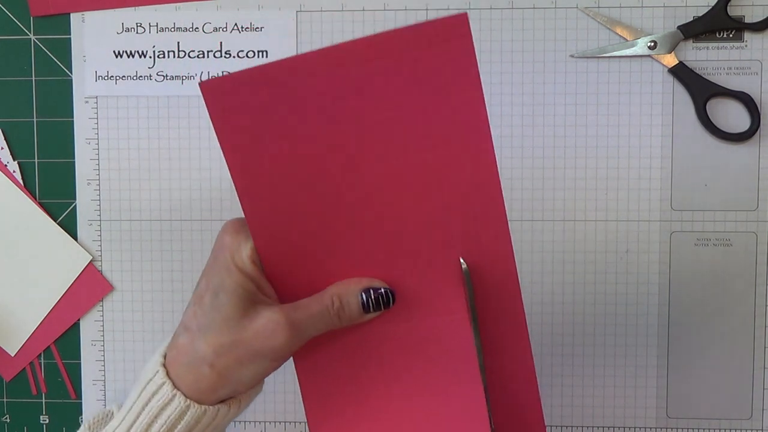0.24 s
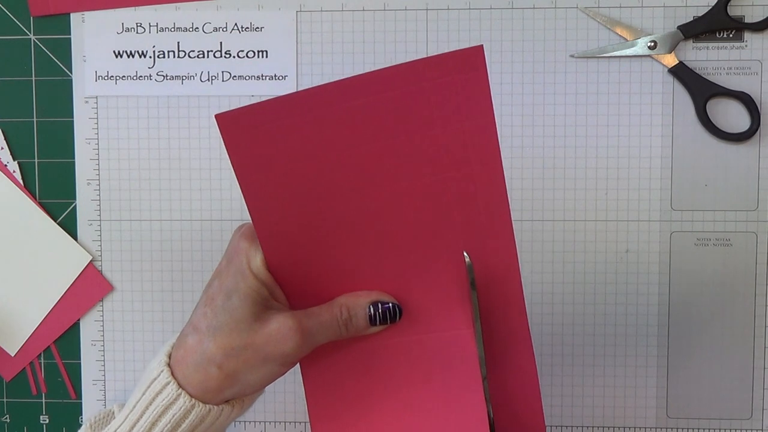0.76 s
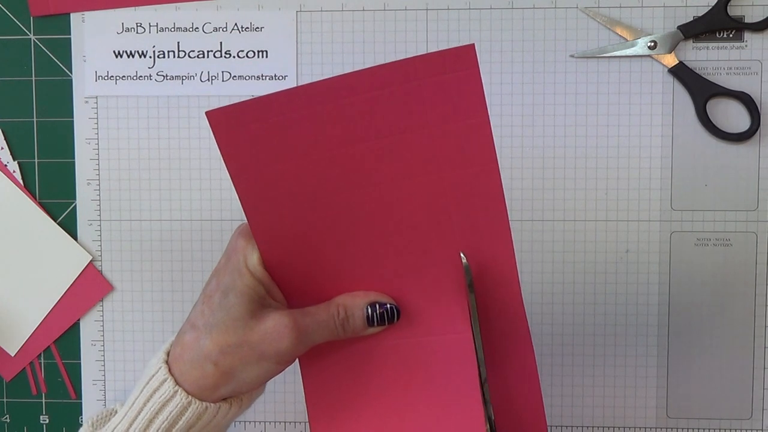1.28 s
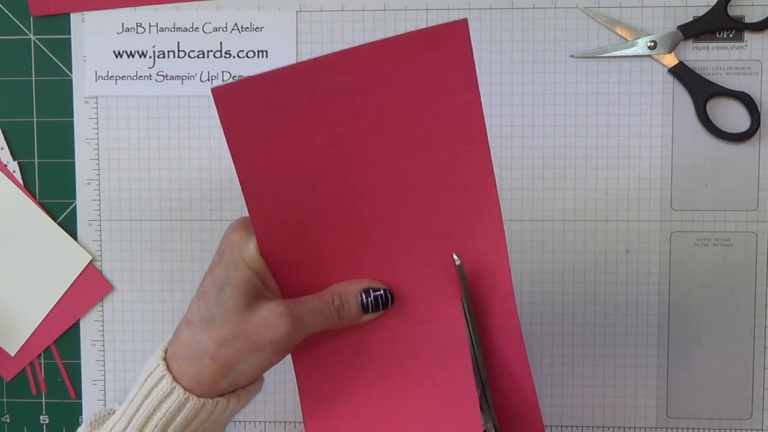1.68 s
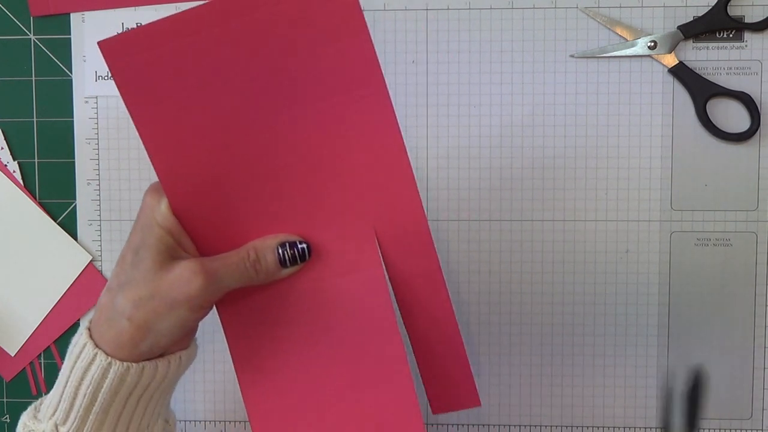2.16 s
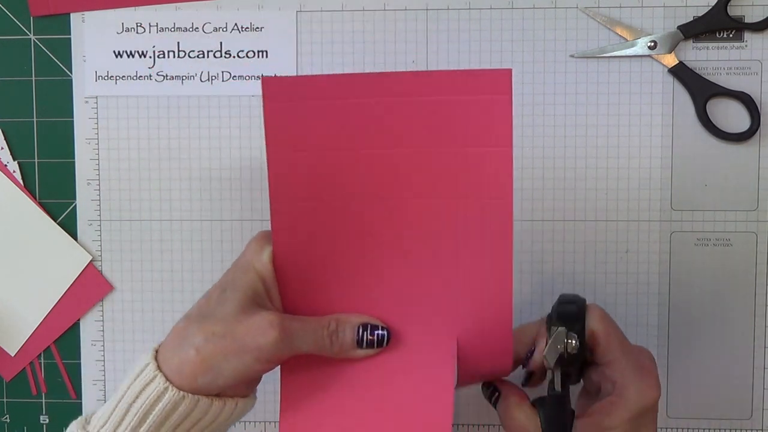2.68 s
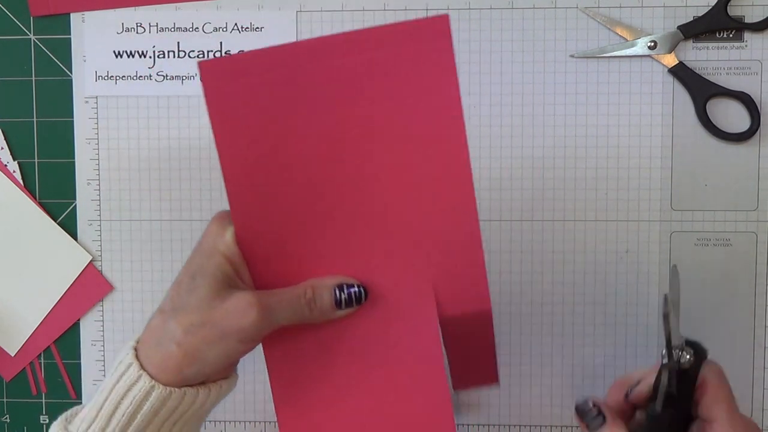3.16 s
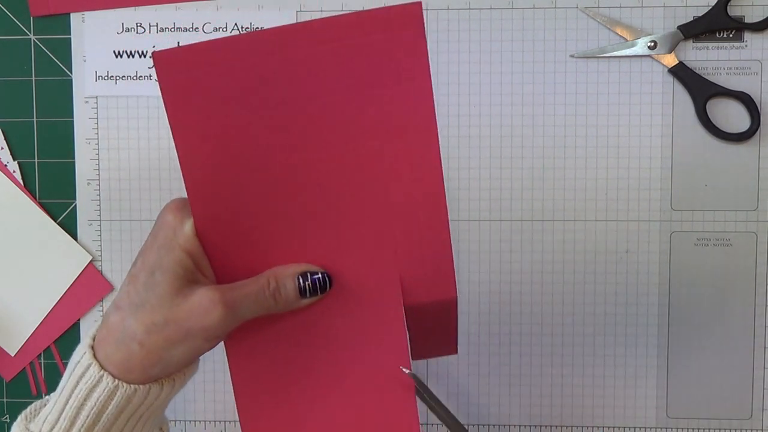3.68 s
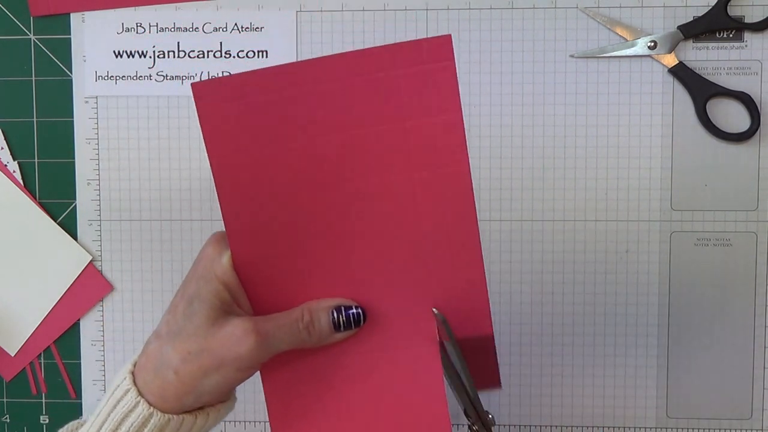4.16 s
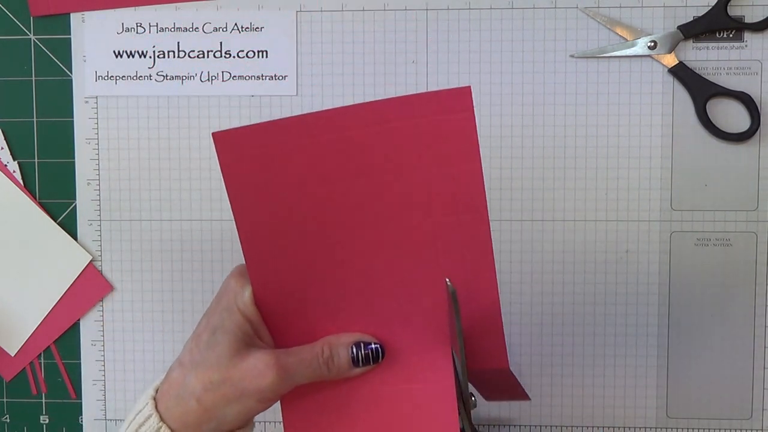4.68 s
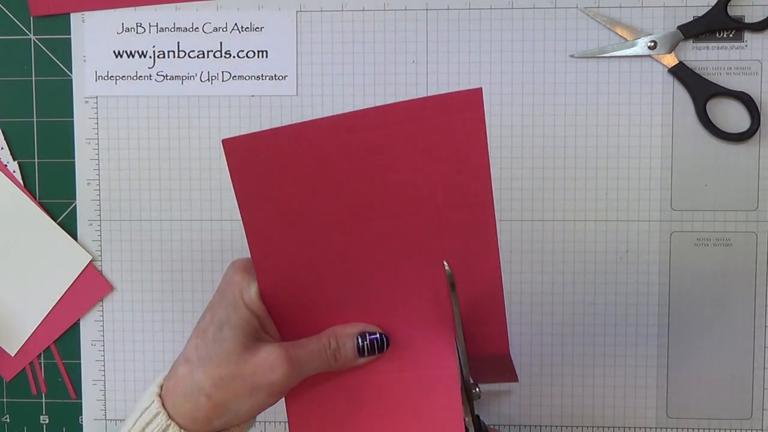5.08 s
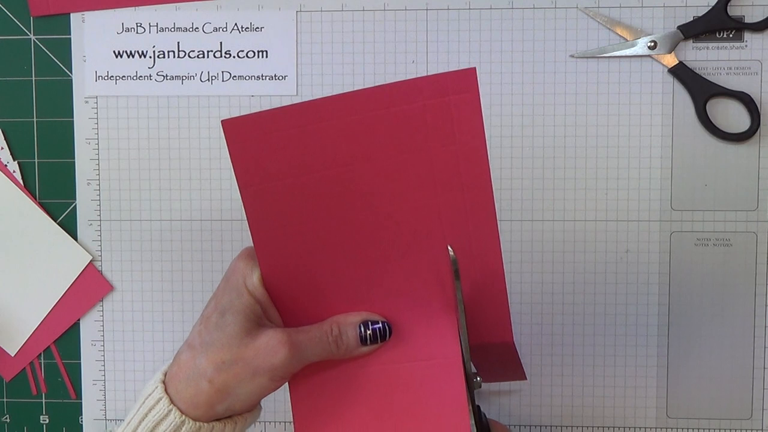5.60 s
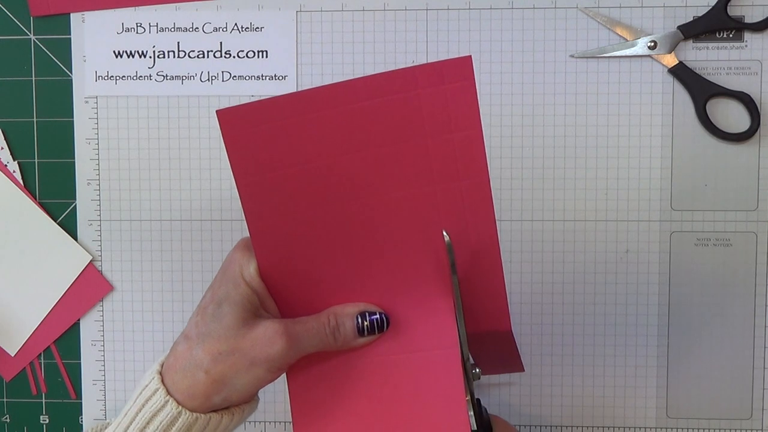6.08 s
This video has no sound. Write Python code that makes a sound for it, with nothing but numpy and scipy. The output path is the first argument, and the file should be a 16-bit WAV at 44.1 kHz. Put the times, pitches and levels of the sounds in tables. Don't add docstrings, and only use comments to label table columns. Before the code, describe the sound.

Stiff card is cut in two uneven bursts, heard close with only a short dull room tail. Between the cuts come papery creaks, a rough tug with tiny steel chirps, springy snaps, light metal ticks and soft handling rubs. After the second long slice, a couple of hard snaps give way to sparse crumbly scratches and a last gentle shake, over constant low hum and microphone hiss.

```python
import sys
import numpy as np
from scipy import signal
from scipy.fft import rfft, irfft, next_fast_len
from scipy.io import wavfile
from scipy.ndimage import uniform_filter1d

SR = 44100
rng = np.random.default_rng(int(sys.argv[2]) if len(sys.argv) > 2 else 0)


def output_pcm(signal):
    pcm = np.clip(np.atleast_2d(signal).T, -1, 1) * 32767
    wavfile.write(sys.argv[1], SR, np.round(pcm).astype(np.int16))


def boost(x):
    u = np.asarray(x, float) / 20
    return 10 ** u


N = 279594

# frequency in Hz, width in Hz, level in dB.
SHEET_MODES = [(433, 42, -2.5), (602, 54, 3.5), (635.6, 58, 3.5), (872, 95, 3), (1004, 7.7, -0.5),
               (1150, 210, 4)]
# frequency in Hz, width in Hz, level in dB.
EDGE_MODES = [(1740, 88, 6.5), (2066, 84, 9), (2686, 48, 3), (3300, 460, -4), (3240, 130, -9),
              (4060, 130, 5.5)]


def evened(x):
    return x / np.sqrt(np.mean(x ** 2) + 1e-20)


def read(points, hz):
    f, value = np.transpose(points)
    return np.interp(np.log(hz + 1), np.log(f + 1), value)


def add(mix, s, sound):
    part = mix[round(s * SR):][:len(sound)]
    part += sound[:len(part)]


def band(x, lo_hz, hi_hz, order=2):
    return signal.lfilter(*signal.butter(order, [lo_hz, hi_hz], "bandpass", fs=SR), x)


def resonate(x, hz, width):
    turn = np.exp(2j * np.pi * np.cumsum(hz * np.ones(len(x))) / SR)
    r = np.exp(-np.pi * width / SR)
    smooth = signal.lfilter([1 - r], [1, -r], x / turn)
    return 2 * (turn * smooth).real / np.sqrt(1 - r)


def body(x, modes, detune):
    return sum((-1) ** k * boost(db) * resonate(x, hz * detune[k], width)
               for k, (hz, width, db) in enumerate(modes))


def floor():
    # frequency in Hz, density in dB per Hz.
    hiss_curve = [(21, -41), (35, -12), (119, -8), (198, -9), (347, -8), (405, -13), (522, -12),
                  (1560, -14), (2020, -16), (2740, -15), (4440, -19), (5050, -18.5), (15500, -23.5)]
    # frequency in Hz, side over mid in dB.
    hiss_width = [(60, 2), (110, -6.5), (200, -2.5), (380, -7.5), (700, -9), (1290, -13), (2380, -16.5),
                  (4400, -16.5), (8120, -9.5), (15000, -19.5)]
    # frequency in Hz, level in dB, left over right in dB.
    hum_tones = [(49.2, -75.5, 5), (95, -83.5, 2), (150.5, -75.5, 1), (198.7, -66.5, -3.2),
                 (250.6, -73.5, -1), (300.5, -72, 2.5), (399.5, -73.5, 0.5)]
    hiss_db = -60.5
    size = next_fast_len(N)
    hz, t = np.fft.rfftfreq(size, 1 / SR), np.arange(N) / SR
    mid, side = rfft(rng.standard_normal((2, size))) * boost(read(hiss_curve, hz))
    mid = irfft(mid, size)[:N]
    side = irfft(side * boost(read(hiss_width, hz)), size)[:N]
    hiss = boost(hiss_db) * np.array([mid + side, mid - side]) / np.std(band(mid, 430, 16000))
    hum = np.zeros((2, N))
    for f, db, left_db in hum_tones:
        drift = uniform_filter1d(uniform_filter1d(rng.standard_normal(N), 1500), 1500)
        pan_db = np.array([[left_db / 2], [-left_db / 2]])
        level = np.sqrt(2) * boost(db + 1.4 * evened(drift) + pan_db)
        hum += level * np.sin(2 * np.pi * (f * t + rng.random()))
    return hiss + hum


def grains(per_s, spread_db, rub_level, waver_db):
    size = boost(spread_db * np.minimum(rng.exponential(1, N), 3.2)) * rng.choice([-1, 1], N)
    breaks = evened(size * (rng.random(N) < per_s / SR)) + rub_level * rng.standard_normal(N)
    waver = evened(uniform_filter1d(rng.standard_normal(N), 150))
    return evened(breaks * boost(waver_db * np.clip(waver, -3, 1.8)))


def stroke(fibres, rows, held_hz=(), held_db=0, top_hz=4720):
    # frequency in Hz, width in Hz, level in dB.
    blade_modes = [(5320, 170, 0.67), (8560, 670, 1.7), (11900, 1700, 4.4), (14300, 600, 1.8)]
    # time in seconds, resonance in Hz.
    flap_path = [(.2, 1870), (.36, 3430), (.6, 3300), (1.02, 1740), (1.63, 2050), (1.67, 3280),
                 (1.96, 3300), (2, 2320), (2.06, 3500), (2.09, 2030), (2.52, 1860), (2.62, 3300),
                 (3.1, 3120), (3.75, 2400), (4.05, 3200), (4.16, 1680), (4.62, 1910), (5.3, 3940)]
    # time in seconds, lower ring in Hz, upper ring in Hz.
    contact_path = [(.2, 7600, 11000), (.3, 7150, 12500), (.45, 4970, 10700), (1.63, 7100, 10200),
                    (1.75, 7000, 10300), (1.9, 7540, 11000), (2.06, 7460, 9900), (2.65, 7140, 10300),
                    (2.99, 6600, 9700), (3.1, 6430, 12100), (3.79, 5900, 8800), (4, 7500, 13600),
                    (4.2, 7500, 10400), (4.42, 6400, 7800), (4.47, 8100, 10800), (4.57, 8100, 10800),
                    (5.6, 7000, 10500)]
    s, *columns = np.transpose(rows)
    drive, direct, flap = fibres[:, round(s[0] * SR):round((s[-1] + .006) * SR)]
    t = s[0] + np.arange(len(drive)) / SR
    tear_db, boom_db, fizz_db = (np.interp(t, s, c) for c in columns)
    fade_in = np.clip((t - s[0]) / 0.00025, 0, 1)
    fade_out = np.clip(1 - (t - s[-1]) / 0.0038, 0, 1)
    detune = 1 + 0.022 * rng.standard_normal(6)

    held = boost(held_db) * sum(resonate(flap, hz, 63) for hz in held_hz)
    boom = evened(held + body(drive, SHEET_MODES, detune) + 5.6 * band(direct, 220, 770))

    free_end = boost(9.0) * resonate(flap, np.interp(t, *np.transpose(flap_path)), 320)
    edge = 0.5 * body(drive, EDGE_MODES, detune) + free_end
    edge = evened(band(edge, 750, 0.83 * top_hz) + 9.7 * band(direct, 1100, top_hz))

    when, *contact_hz = np.transpose(contact_path)
    steel = boost(5.0) * sum(resonate(drive, np.interp(t, when, hz), 550) for hz in contact_hz)
    fizz = body(direct, blade_modes, detune) + steel + 11.2 * flap
    fizz = evened(band(fizz, 3560, 12550, order=3))
    mixed = edge + boost(boom_db) * boom + boost(fizz_db) * fizz
    return s[0], boost(tear_db) * fade_in * fade_out * mixed


def swipes():
    # start in seconds, length in seconds, tearing in dB, sheet boom and blade fizz in dB over it.
    swipe_rows = [
        (0, 0.11, -57.5, -6.5, 7),
        (2.628, 0.084, -56, -10, 5.5),
        (3.064, 0.055, -48.5, -8.5, 0.5),
        (4.829, 0.063, -57.5, 2, -7),
        (5.185, 0.074, -55.5, -9.5, -17),
    ]
    rise_s, start_db, stop_s, end_db = 0.0066, -1, 0.018, -12
    for s, length, db, *colour in swipe_rows:
        shape = [(0, start_db), (rise_s, 0), (length - stop_s, 0), (length, end_db)]
        yield [[(s + after, db + change_db, *colour) for after, change_db in shape]]


def rubs():
    # start in seconds, length in seconds, tearing in dB, sheet boom and blade fizz in dB over it.
    rub_rows = [(0.147, 0.038, -47, -1.5, -14), (0.56, 0.095, -59.5, -4, -12), (1.05, 0.094, -63, -8, -17),
                (1.952, 0.023, -33.5, -13, -1.5), (2.565, 0.087, -58.5, -22, 6),
                (2.75, 0.12, -59.5, -4, -0.5), (2.977, 0.038, -56.5, 0, 10), (3.022, 0.049, -52.5, 1.5, 1),
                (3.85, 0.097, -58.5, -15, -18), (3.94, 0.05, -54, -18, 0.5), (3.97, 0.057, -51, -13, -5),
                (4.03, 0.08, -55.5, -13, 1.5), (4.08, 0.12, -54.5, -13, -5.5), (4.64, 0.094, -53, -8.5, -8),
                (4.941, 0.058, -54, -2, -13), (4.99, 0.067, -51, -8, -23), (5.345, 0.044, -56.5, -6, -7),
                (5.571, 0.15, -58, -5, -10), (5.62, 0.036, -54, -5, -4), (5.71, 0.13, -64, -2, -15),
                (5.74, 0.023, -55.5, -6, -3), (5.89, 0.081, -58, -1.5, -5), (6.025, 0.057, -53.5, -5, -5.5),
                (6.14, 0.022, -61, 4, -8), (6.195, 0.036, -63, -5, -9)]
    top, start_db, end_db = 0.56, -11, -15.5
    for s, length, db, *colour in rub_rows:
        yield [[(s, db + start_db, *colour), (s + top * length, db, *colour),
                (s + length, db + end_db, *colour)]]


def snap(s, peak_db, hz, boom_hz, boom_db, tick_db, first=2.1, spread=0.000053, raw=1.62):
    t = np.arange(3000) / SR
    burst, after = rng.standard_normal((2, len(t)))
    kick = burst * t / spread * np.exp(1 - t / spread) + 0.098 * after * boost(-60 * t / 0.028)
    kick[0] -= first
    detune = 1 + 0.013 * rng.standard_normal(6)
    ring = resonate(kick, hz, 190) + 0.2 * body(kick, EDGE_MODES, detune) + raw * kick
    boom = resonate(kick, boom_hz, 113) + 0.24 * body(kick, SHEET_MODES, detune)
    parts = [band(ring, 670, 4050), boom * boost(-60 * t / 0.3), band(kick, 5500, 13300, order=3)]
    ring, boom, bright = (p / abs(p).max() for p in parts)
    mixed = 0.64 * ring - boost(boom_db) * band(boom, 340, 740, order=1) - boost(tick_db) * bright
    return s + 0.001066, boost(peak_db) * mixed


def snaps():
    # start in seconds, peak in dB, edge ring in Hz, sheet ring in Hz, hardness in dB.
    snap_rows = [
        (0.164, -40.5, 1680, 840, 2),
        (0.212, -15.5, 1930, 450, -10),
        (0.22, -48, 1940, 463, -10),
        (1.475, -46, 1740, 450, -1),
        (1.772, -31.5, 2180, 930, -1.5),
        (2.224, -24, 2090, 1060, -6.5),
        (3.618, -33.5, 1900, 1010, -8),
        (4.736, -25, 1230, 960, -1),
        (4.767, -47, 2360, 1050, -1),
        (4.907, -23.5, 2050, 940, -33),
    ]
    for s, peak_db, hz, boom_hz, hard_db in snap_rows:
        boom_db = max(-7 + hard_db, -14)
        yield snap(s, peak_db, hz, boom_hz, boom_db, hard_db)


def cuts():
    # time in seconds, pressure in dB, blade slide in dB.
    first_cut = [
        [(.189, -50, -8), (.195, -44, -5), (.21, -45, -10), (.219, -39.5, -7), (.24, -50.5, -5), (.27, -41, -3),
         (.303, -39.5, -9.5), (.308, -50, -10), (.325, -60, -8)],
        [(.318, -54, -13), (.337, -50, -17), (.4, -42, -11), (.47, -39, -8.5), (.554, -41.5, -18),
         (.573, -46, -18), (.578, -52, -16), (.62, -71, -9)],
    ]
    pull_out = [
        [(1.62, -51, -12), (1.634, -33, -10.5), (1.65, -43, -1.5), (1.714, -44.5, 2), (1.76, -60, -12)],
        [(1.777, -58, -19), (1.791, -56, 2), (1.8, -36, -26), (1.803, -47, -1), (1.826, -42, -9),
         (1.878, -51, 1), (1.882, -44.5, -3), (1.906, -49, 2), (1.948, -49, 3)],
        [(2.009, -62, -14), (2.02, -54, -8), (2.034, -47, 5), (2.04, -44, 1), (2.046, -35, 3.5),
         (2.049, -61, -10)],
        [(2.05, -43, -4), (2.056, -41.5, 3.5), (2.071, -39.5, 6), (2.074, -44, -3), (2.082, -46, 8),
         (2.092, -39.5, -0.5), (2.1, -43, 0), (2.104, -50, -6), (2.14, -68, -14)],
    ]
    second_cut = [
        [(3.765, -42, -12), (3.78, -38, -12), (3.79, -33, -6), (3.798, -36, -6), (3.8, -41, -14),
         (3.817, -56, -18), (3.822, -65, -18), (3.85, -81, -15)],
        [(4.156, -44.5, -0.5), (4.168, -52.5, 4.5), (4.19, -50.5, -2), (4.22, -41.5, -9), (4.25, -48, -0.5),
         (4.262, -49, -11), (4.28, -44, -18), (4.308, -54, -14)],
        [(4.31, -50, -8), (4.39, -37, -9), (4.425, -34, -3), (4.45, -37.5, -6), (4.49, -44, -5),
         (4.575, -39.5, -1.5), (4.586, -44.5, -9), (4.605, -52, -13), (4.615, -58, -18)],
    ]
    # looseness in dB, held mode in Hz, second mode in Hz,
    # strength of both in dB, top of the tearing in Hz.
    grip_rows = [
        (3, 547, 790, -1, 4700),
        (-3.5, 862, 674, 1, 5000),
        (-5, 650, 880, -14, 5000),
        (-2, 930, 485, -2, 4700),
        (-1, 1130, 620, 2, 4500),
        (-1, 1130, 620, 2, 4000),
        (-4, 760, 1050, 2, 2600),
        (2.5, 1090, 540, 5, 4000),
        (2.5, 862, 568, 6, 4400),
    ]
    for curve, (loose_db, *held_hz, held_db, top_hz) in zip(first_cut + pull_out + second_cut, grip_rows):
        rows = []
        for s, db, slide_db in curve:
            boom_db = loose_db - 5 - 0.2 * (db + 48) - 0.1 * (slide_db + 13)
            rows.append((s, db, boom_db, slide_db))
        yield rows, held_hz, held_db, top_hz


def thumps():
    # start in seconds, frequency in Hz, level in dB, T60 in seconds.
    knocks = [
        (0.212, 297, -43.5, 0.083),
        (0.951, 330, -68, 0.058),
        (4.461, 246, -44, 0.039),
        (6.043, 191, -48, 0.069),
    ]
    # start in seconds, frequency in Hz, level in dB, T60 in seconds.
    ringing = [
        (.214, 480, -42, 0.13),
        (1.991, 646, -39, 0.11),
        (3.028, 767, -43, 0.05),
        (4.164, 1713, -40.5, 0.1),
    ]
    t = np.arange(8000) / SR
    for s, hz, db, t60 in knocks + ringing:
        push = boost(db + 10.5 - 60 * t / t60) * (1 - np.exp(-t / 0.006))
        yield s, push * np.sin(2 * np.pi * hz * t)


def ticks():
    # start in seconds, peak in dB, ring in Hz.
    tick_rows = [(0.22, -40, 9500), (1.111, -50, 4000), (1.131, -49, 4300), (1.2943, -47, 4330),
                 (1.2945, -46, 6200), (2.5323, -44, 5900), (2.54, -41, 11000), (2.835, -48, 10500),
                 (3.1827, -43, 9500), (3.34, -37, 10140), (3.3403, -42, 13000), (3.3467, -44, 7250),
                 (3.5212, -46, 8900), (3.757, -49, 6000), (4.736, -33, 6500), (4.9055, -32, 4300),
                 (4.906, -32, 5200), (5.667, -47, 12500), (6.135, -48, 10500), (6.274, -47, 10400)]
    t = np.arange(1500) / SR
    for s, peak_db, hz in tick_rows:
        kick, scratch = rng.standard_normal((2, len(t))) * np.exp(-t / 0.0016)
        ring = band(resonate(kick, hz, 640) + 0.86 * scratch, 2000, 11300)
        yield s + 0.0011, boost(peak_db) * ring / abs(ring).max()


def slips():
    # start in seconds, peak in dB, edge ring in Hz, sheet ring in Hz.
    slip_rows = [(0.268, -25.5, 3660, 567), (1.244, -33, 1980, 885), (1.958, -28, 3300, 500),
                 (1.964, -31, 3220, 516), (1.991, -23, 2130, 630), (1.997, -28, 2070, 860),
                 (2.003, -34, 2090, 480), (2.515, -32, 1850, 854), (3.029, -41, 1420, 785),
                 (3.7645, -29, 1920, 800), (3.785, -24.5, 2100, 655), (3.79, -23.5, 2320, 654),
                 (3.795, -27.5, 2400, 1050), (4.157, -31, 1740, 1080), (4.749, -31.5, 3360, 770),
                 (5.026, -38.5, 2750, 506), (5.117, -31, 2190, 850), (5.634, -32.5, 3870, 1150),
                 (5.753, -39, 2800, 875), (5.92, -39.5, 2050, 1070), (6.036, -38.5, 2060, 1110),
                 (6.115, -31.5, 1740, 980), (6.213, -34, 1850, 965)]
    for s, *columns in slip_rows:
        yield snap(s - .001, *columns, boom_db=-8.5, tick_db=-15, first=0, spread=0.0012)


def creaks():
    # start in seconds, peak in dB, edge ring in Hz, sheet ring in Hz.
    creak_rows = [(1.035, -31, 2930, 610), (1.042, -30, 1820, 1000), (1.11, -43, 1740, 780),
                  (1.13, -44, 2020, 401), (1.17, -45, 1700, 690), (1.192, -29, 1710, 920),
                  (1.197, -23.5, 1690, 930), (1.231, -33.5, 1510, 800), (1.288, -44, 1770, 406),
                  (1.309, -46, 1740, 690), (1.324, -50, 1760, 690), (1.337, -62, 1760, 684),
                  (1.635, -24, 2050, 800), (3.858, -34, 2930, 770), (3.88, -35, 2970, 766),
                  (3.902, -38, 2880, 760), (4.17, -25, 1640, 1240), (4.274, -27, 1830, 577),
                  (6.058, -43, 1730, 993)]
    for s, *columns in creak_rows:
        yield snap(s - .001, *columns, boom_db=-13, tick_db=-17, first=0, spread=0.0015, raw=0.71)


def jolts():
    # start in seconds, length in seconds, tearing in dB, sheet boom and blade fizz in dB over it.
    jolt_rows = [
        (1.036, 0.033, -42, -9, -7),
        (1.19, 0.041, -41, -3, -15),
        (1.224, 0.057, -62, -5, -9),
        (1.989, 0.046, -40, 4.5, 0.5),
        (2.223, 0.041, -56, 9, -1),
        (2.514, 0.1, -57, 5, -11),
        (3.612, 0.17, -54.5, 2, -12),
        (4.746, 0.11, -53.5, -3.5, -11),
        (4.907, 0.043, -50.5, 7.5, -18),
        (6.103, 0.26, -55, -2, -8),
    ]
    rise_s, start_db, end_db = 0.0038, -39, -24
    for s, length, db, *colour in jolt_rows:
        yield [[(s, db + start_db, *colour), (s + rise_s, db, *colour), (s + length, db + end_db, *colour)]]


def squeaks():
    # start in seconds, length in seconds, start in Hz, end in Hz, level in dB.
    squeak_rows = [
        (1.882, .032, 10100, 11900, -43),
        (1.898, .024, 6900, 7500, -46),
        (1.9, .027, 9100, 10100, -37),
        (1.939, .014, 10800, 11300, -45),
        (1.955, .016, 3300, 3600, -40),
        (2.017, .012, 3100, 3200, -41),
        (2.052, .022, 3000, 3300, -36),
        (2.052, .016, 7500, 7400, -43),
        (2.06, .014, 9600, 9700, -43),
    ]
    for s, length, start_hz, end_hz, db in squeak_rows:
        count = round(length * SR)
        hz = np.linspace(start_hz, end_hz, count)
        tone = np.sqrt(2) * np.sin(2 * np.pi * np.cumsum(hz) / SR)
        rough = evened(resonate(rng.standard_normal(count), hz, 330))
        yield s, boost(db) * np.hanning(count) * (tone + 0.26 * rough)


def crumbs():
    # start in seconds, peak in dB.
    crumb_rows = [(5.611, -40), (5.65, -38.5), (5.685, -44), (5.742, -42), (5.795, -42), (5.957, -39.5),
                  (5.999, -36), (6.01, -41), (6.162, -53), (6.187, -40), (6.207, -43)]
    for s, peak_db in crumb_rows:
        yield snap(s - .001, peak_db, hz=4080, boom_hz=1050, boom_db=-6, tick_db=-9.5,
                   first=0, spread=0.00083, raw=2.2)


def flexed(x, patchy_db=2.5):
    z = signal.stft(x, nperseg=256, noverlap=192)[2]
    patches = uniform_filter1d(uniform_filter1d(rng.standard_normal(z.shape), 4, 0), 18, 1)
    gain = boost(patchy_db * np.clip(evened(patches), -3, 1.6))
    return signal.istft(z * gain / np.sqrt(np.mean(gain ** 2)), nperseg=256, noverlap=192)[1][:N]


def echoed(x):
    # time in seconds, delay in ms.
    late_delay = [(.3, 0.73), (1.65, 0.65), (2.05, 0.72), (2.6, 0.86), (3.77, 0.7), (3.95, 0.89),
                  (4.2, .83), (4.5, 0.68), (5.6, 0.6), (6.1, 0.54)]
    early_delay_ms = 0.3
    n = np.arange(N)
    early_echo = np.interp(n - early_delay_ms * SR / 1000, n, x)
    late = np.interp(n / SR, *np.transpose(late_delay)) * SR / 1000
    late_echo = x[np.maximum(n - np.round(late).astype(int), 0)]
    return x + 0.18 * early_echo - 0.24 * late_echo


def ports(card):
    # frequency in Hz, side over mid in dB.
    port_width = [(60, -6), (110, -22), (200, -14), (380, -15), (700, -17), (1290, -24), (2380, -26.5),
                  (3400, -27), (5200, -19), (8120, -17.5), (15000, -28)]
    size = next_fast_len(N)
    width = boost(read(port_width, np.fft.rfftfreq(size, 1 / SR)))
    side = irfft(rfft(card, size) * np.exp(1.9j) * width, size)[:N]
    return np.array([card + side, card - side])


def room(x):
    t60 = 0.26
    t = np.arange(round(.4 * SR)) / SR
    taps = rng.standard_normal((2, len(t))) * (t > .004)
    tail = band(taps, 110, 2350, order=1) * boost(-60 * t / t60)
    tail += 0.12 * taps * boost(-60 * t / (.5 * t60))
    tail = np.array([tail[0] + 0.046 * tail[1], tail[0] - 0.044 * tail[1]])
    return signal.fftconvolve(x[None], tail / np.linalg.norm(tail[0]), axes=1)[:, :N]


def scene():
    card = np.zeros(N)
    tearing = grains(per_s=4500, spread_db=5.66, rub_level=0.66, waver_db=0.31)
    fibres = np.array([tearing, np.roll(tearing, N // 3), np.roll(tearing, -N // 3)])
    for strokes in [swipes, rubs, cuts, jolts]:
        for settings in strokes():
            add(card, *stroke(fibres, *settings))
    card = echoed(flexed(card))
    for source in [snaps, thumps, ticks, slips, creaks, squeaks, crumbs]:
        for s, sound in source():
            add(card, s, sound)
    return ports(card) + boost(-16) * room(card) + floor()


def band_limit(x):
    return signal.sosfilt(signal.butter(12, 16680, fs=SR, output="sos"), x)


def record(dry):
    dry = signal.sosfilt(signal.butter(2, 42, "highpass", fs=SR, output="sos"), dry)
    top_cut = signal.firwin(401, 15950, window=("kaiser", 7), fs=SR)
    dry = signal.oaconvolve(dry, top_cut[None], "same")
    return band_limit(dry)


dry = scene()
out = record(dry)
output_pcm(out)
```